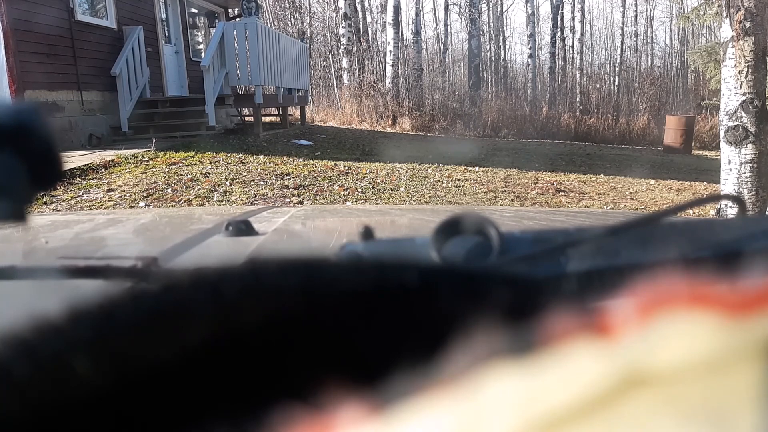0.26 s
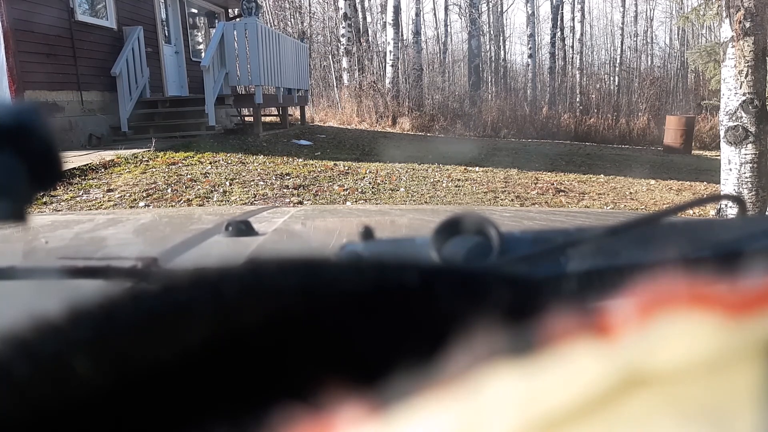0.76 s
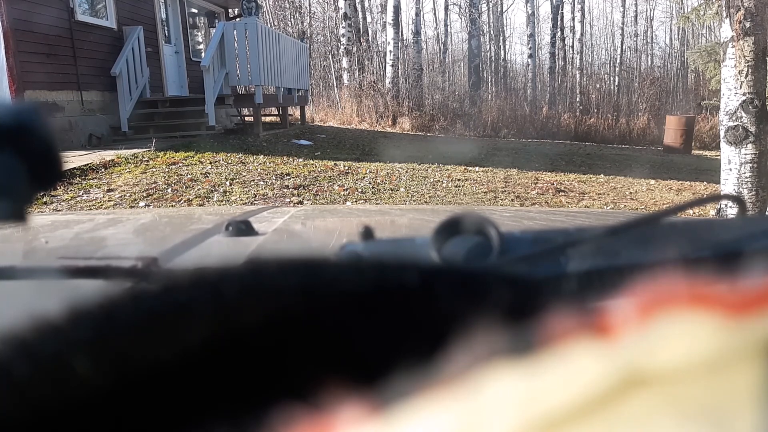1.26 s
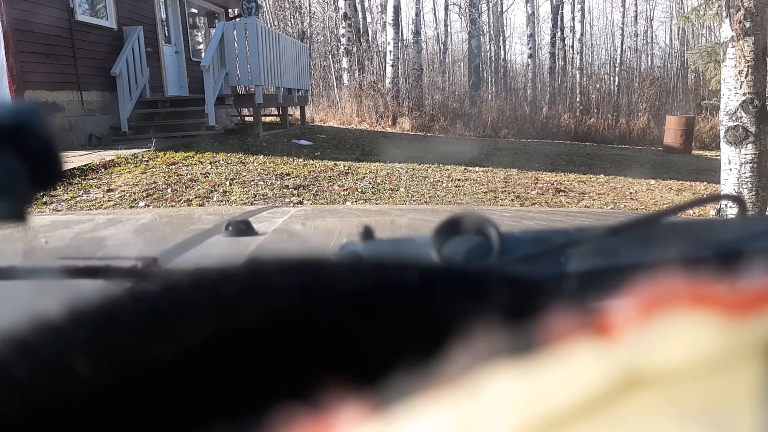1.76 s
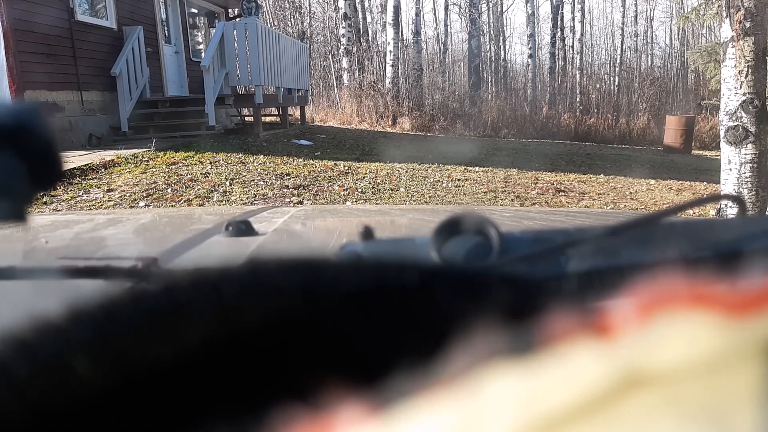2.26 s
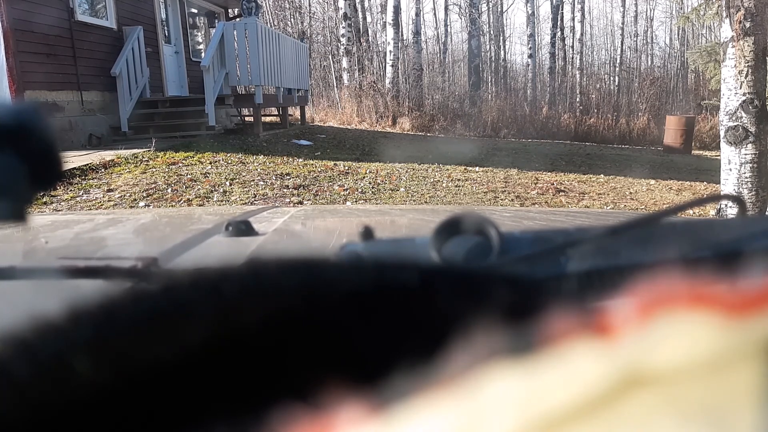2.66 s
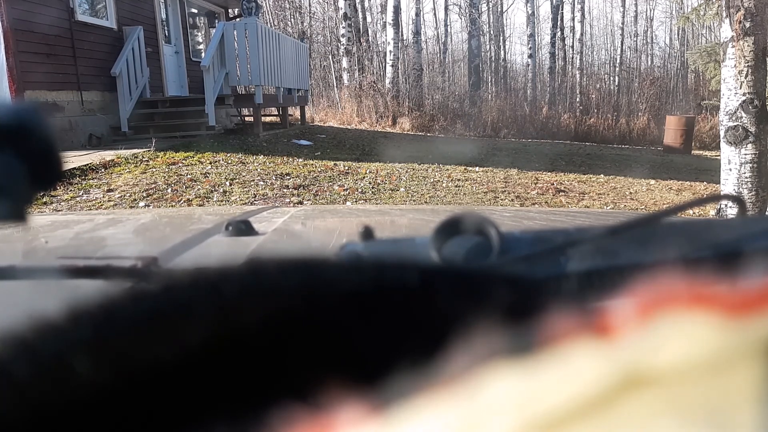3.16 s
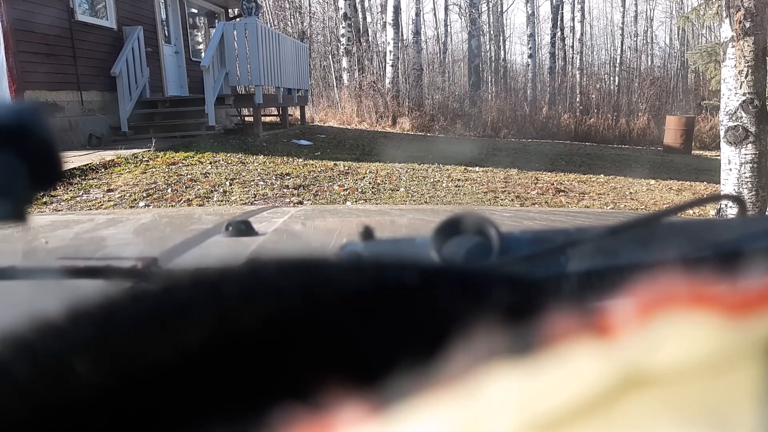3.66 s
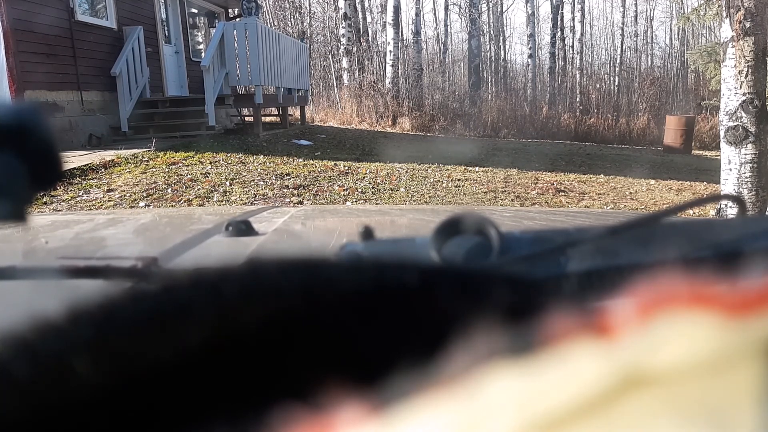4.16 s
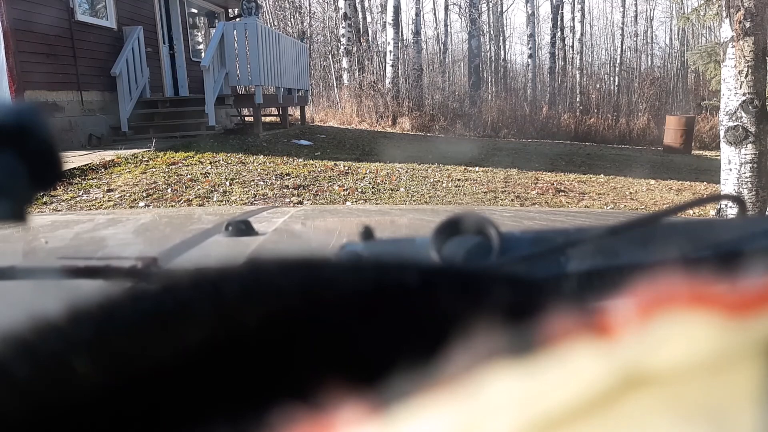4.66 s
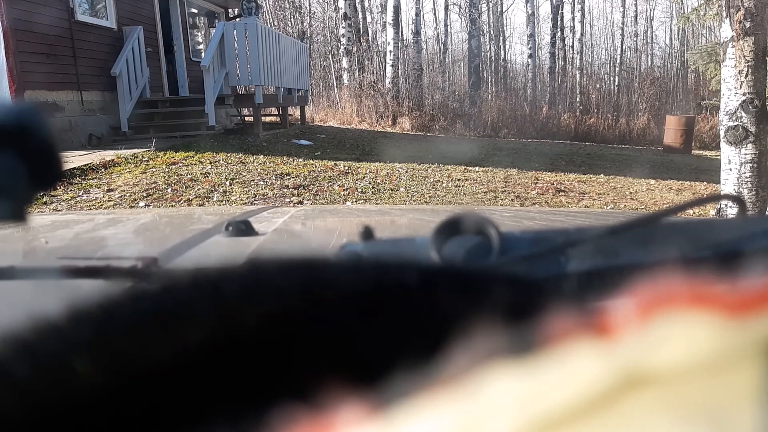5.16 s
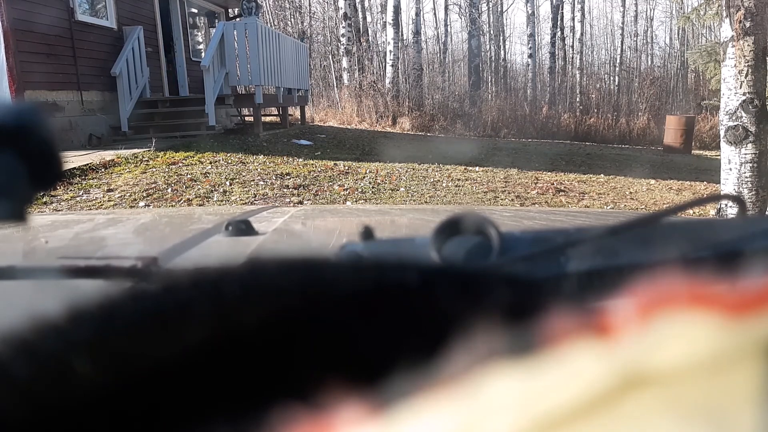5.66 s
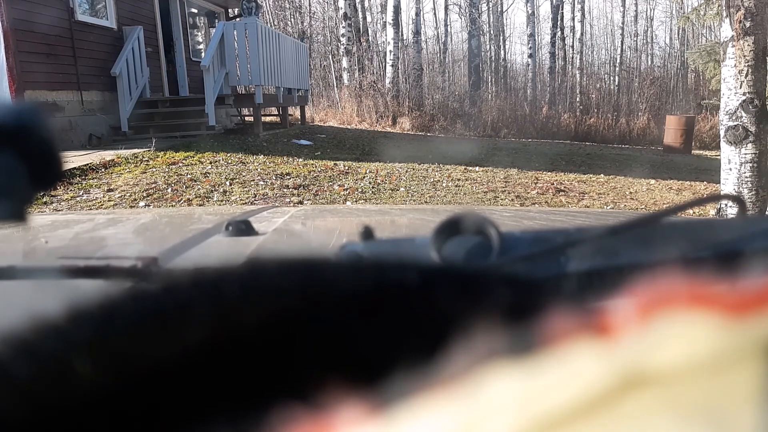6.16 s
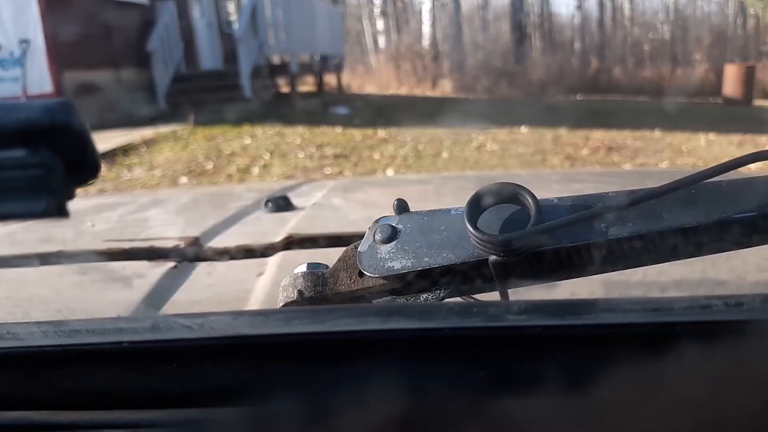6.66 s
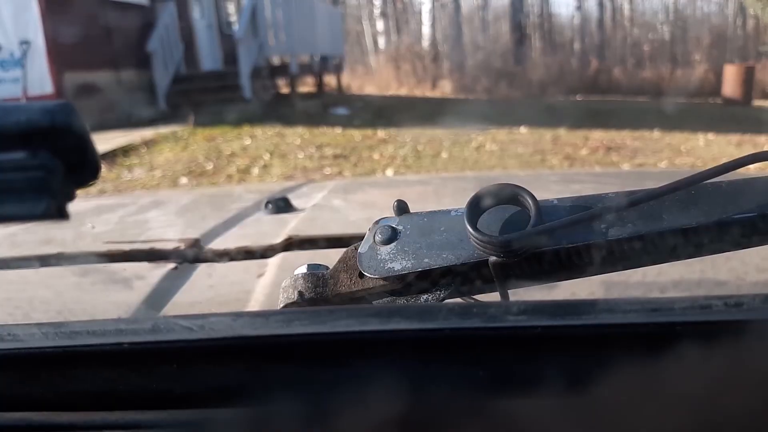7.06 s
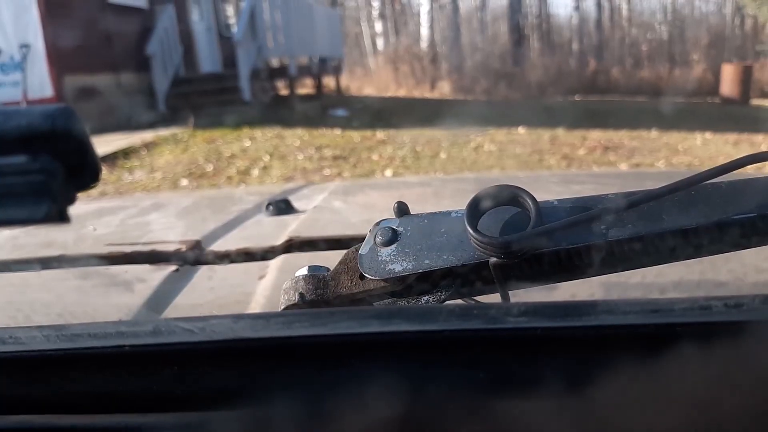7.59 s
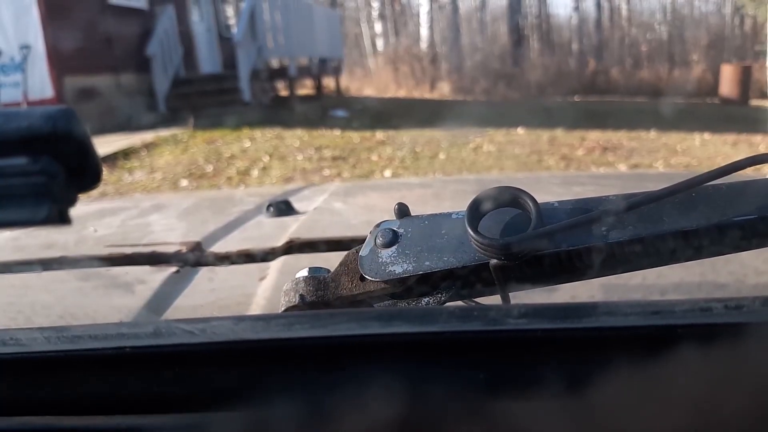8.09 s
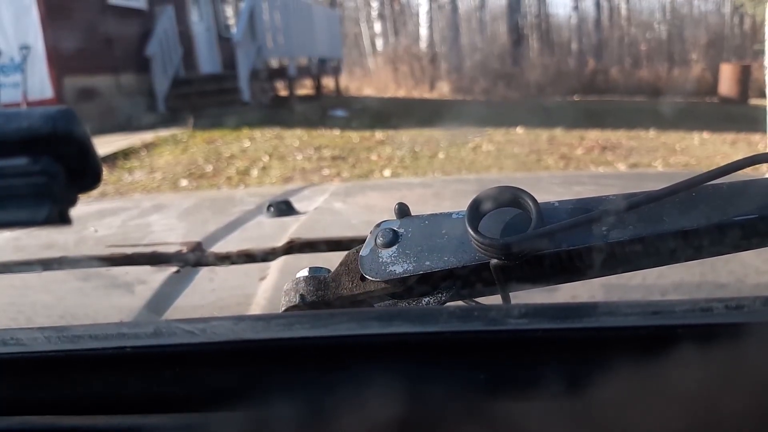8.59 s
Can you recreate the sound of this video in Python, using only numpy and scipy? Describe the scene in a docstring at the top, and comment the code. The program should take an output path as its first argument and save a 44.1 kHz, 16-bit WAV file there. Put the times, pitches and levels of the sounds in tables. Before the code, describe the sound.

Inside a pickup cab, a four-cylinder engine idles with a low boom and knock, then cuts to a slower idle with rapid squeaky rattling.

```python
"""Heard from a pickup's cab: a four-cylinder idle booms, with valve-train knock, gas rumble, lope and fan hum.
Cloth rustles, a small part ticks, the dash is bumped. After a short fade the idle is slower, a loose part
rattles over a hissing buzz at about the firing rate, and the engine picks up speed at the end. Summed
harmonics make the boom, filtered pulses the knock and lope, coloured noise the rumble, rustle and buzz,
decaying modes the hard parts."""
import sys
import numpy as np
from scipy import signal
from scipy.fft import rfft, irfft, next_fast_len
from scipy.io import wavfile
from scipy.ndimage import uniform_filter1d

SR = 44100
rng = np.random.default_rng(int(sys.argv[2]) if len(sys.argv) > 2 else 0)


def wav_record(signal):
    """Record a signal, one row per channel, as 16-bit PCM in the file named by sys.argv[1]."""
    frames = np.transpose(np.atleast_2d(signal))
    bounded = np.clip(frames, -1, 1)
    # unit amplitude maps onto the largest positive 16-bit level
    quanta = np.round(bounded * 32767).astype(np.int16)
    wavfile.write(sys.argv[1], SR, quanta)


N = 389393
T = np.arange(N) / SR
CUT_S = 6.72  # fast idle before, slow idle after

# The fast idle hunts. Each row: time in seconds, firing rate in Hz.
FAST_IDLE = [(0, 25.07), (0.3, 24.79), (0.7, 24.63), (1.3, 24.96), (1.5, 25.04), (1.7, 24.82), (2.1, 24.75),
             (2.9, 25.09), (3.1, 25), (3.5, 24.64), (3.9, 24.95), (4.3, 25.08), (4.7, 24.82), (4.9, 24.77),
             (5.5, 24.95), (5.9, 25.33), (6.1, 25.3), (6.3, 24.99), (6.72, 24.71)]
# Slow idle and final pick-up. Each row: time in seconds, firing rate in Hz, boom lift in dB.
SLOW_IDLE = [(6.72, 17.3, -2), (7.0, 18.3, -0.5), (7.25, 16.9, 2), (7.45, 17, -6), (7.7, 17.2, -7.5),
             (7.94, 17.6, 5), (8.35, 17.3, 1), (8.5, 17.8, 0), (8.62, 21.5, 6.5), (8.69, 25.8, 0),
             (8.77, 22.4, 7.5), (8.83, 22.8, 8)]
# Cab response to firing harmonics, fast idle. Each row: frequency in Hz, mean level in dB rms.
FAST_BOOM = [(25, -58), (50, -40), (75, -35), (100, -23.5), (125, -22), (150, -41), (175, -36), (200, -43),
             (225, -41.5), (250, -47), (275, -46.5), (300, -56), (350, -58), (375, -50)]
# The same, slow idle. Each row: frequency in Hz, level in dB rms before the boom lift.
SLOW_BOOM = [(17, -68), (34, -46), (52, -82), (69, -55), (86, -24.5), (103, -48), (120, -31), (138, -49),
             (155, -48), (172, -80), (275, -59)]
# Relative signed strength of each cylinder's unevenness (no unit).
CYLINDER_STRENGTHS = [-0.77, 0.51, -0.59, -1.3]
# Cab resonances rung by the unevenness. Each row: centre in Hz, filter width in Hz, fast-idle level in dB.
LOPE_MODES = [(135, 23, -54), (148, 25, -41.5), (166.7, 16, -48)]
# Block resonances. Each row: centre in Hz, filter width in Hz, level in dB before the fade, lag in seconds.
KNOCK_MODES = [(1200, 280, -48, 0), (1020, 200, -48, .003), (1150, 45, -51, 0.001), (1920, 260, -52, 0.001),
               (2480, 300, -62, 0.0015), (1220, 200, -59, .012), (680, 130, -55, .01),
               (2050, 350, -59, .028)]
# Slow change of the block's knock. Each row: time in seconds, gain in dB.
KNOCK_FADE = [(0, -1.5), (5.4, -1.5), (5.8, -6.5), (6.72, -8.5), (6.73, -7.5), (8.83, -27)]
# Panel rung at the slow idle. One row: centre in Hz, filter width in Hz, level in dB.
PANEL_MODE = (481, 17, -39.5)
# Accessory drive at the fast idle. Each row: centre in Hz, filter width in Hz, level in dB.
WHINE_MODES = [(3480, 120, -60), (3720, 110, -65.5)]
# Rumble colour, fast idle. Each row: frequency in Hz, relative dB per Hz.
FAST_RUMBLE = [(18, -48), (30, -22), (92, -17.5), (120, -3), (148, -7), (165, -11), (200, -13.5),
               (256, -11), (300, -22), (350, -16), (410, -21), (480, -20.5), (750, -32.5), (1140, -32),
               (1480, -43), (1920, -37), (2310, -43), (6800, -53.5), (8000, -62.5), (15600, -72)]
# Rumble colour, slow idle. Each row: frequency in Hz, relative dB per Hz.
SLOW_RUMBLE = [(18, -45), (30, -10), (90, -2.5), (182, -9), (243, -10.5), (300, -11.5), (400, -15),
               (478, -13), (540, -18), (641, -19), (1000, -27), (1920, -38), (4810, -38), (15600, -72)]

# Colour of the treble hiss. Each row: frequency in Hz, relative dB per Hz.
HISS_COLOUR = [(2500, 7), (4000, 5.5), (6700, 4.5), (8000, -5), (10500, 0.5), (13000, -8), (15000, -8),
               (16000, -10)]
# Treble hiss between the swells. Each row: time in seconds, level in dB before flicker.
HISS_REST = [(0, -61), (.6, -60.5), (1.6, -52), (4.6, -54), (5.3, -54.5), (6.6, -48.5), (7.1, -54),
             (8.83, -45)]
# Swells of treble hiss: cloth rubs, then from 7.4 s the buzz under the rattles.
# Each row: centre in seconds, peak in dB before flicker, half-length in seconds.
HISS_SWELLS = [(0.82, -49.5, 0.12), (1.134, -49, 0.028), (1.24, -52, 0.03), (1.697, -47, 0.068),
               (2.012, -47.5, 0.026), (2.238, -47, 0.051), (2.516, -53.5, 0.18), (2.827, -44, 0.017),
               (2.997, -49, 0.058), (3.187, -48.5, 0.11), (3.455, -51, 0.14), (3.868, -49.5, 0.11),
               (4.19, -47.5, 0.12), (4.427, -49, 0.082), (4.778, -48.5, 0.086), (5.615, -44.5, 0.052),
               (6.003, -47, 0.11), (6.27, -47, 0.17), (6.803, -48, 0.09), (7.455, -45.5, 0.21),
               (8.136, -43.5, 0.32), (8.802, -57, .1)]

# Rattles of a loose part. Each row: start in seconds, treble level in dB, squeak in Hz, its dB,
# second squeak in Hz, its dB, shared ring in dB (10 dB is added); dB after the first are re the treble.
RATTLES = [(2.66, -53.5, 3497, 0, 4500, -12, 6), (5.223, -54, 3520, 1, 4504, -12, -3),
           (5.9168, -33, 4940, -9, 6000, -6, -12), (6.766, -36.5, 4790, -20, 10350, -5, 6),
           (6.828, -39, 15400, -9, 7700, 2, -10), (6.886, -42.5, 8460, 2.5, 6500, -2, -12),
           (7.2913, -33, 5160, 0.5, 4310, -7, 2), (7.349, -32, 4610, 0.5, 5100, -2, 1),
           (7.405, -33, 5030, 0.5, 4500, -4, 6.5), (7.464, -31.5, 4480, 0, 5070, -3, 2),
           (7.5215, -32.5, 4900, -4, 4400, -8, 2), (7.5795, -32, 4800, -1, 4040, -8, 3.5),
           (7.638, -30.5, 5020, 0.5, 4280, 0, 0), (7.696, -32.5, 5300, 0.5, 4305, -5, 9),
           (7.754, -33, 4900, -1, 3694, -13, 9), (7.811, -29.5, 4760, 2.5, 3470, -8, -14),
           (7.869, -27.5, 4940, 3, 2630, -18, -16), (7.927, -30, 5000, 3, 4400, 2, -16),
           (7.984, -29.5, 4230, 4.5, 4900, -4, -18), (8.043, -29.5, 4330, 5, 3510, 1, -14),
           (8.101, -28.5, 4520, 3.5, 3440, -12, -13), (8.16, -30.5, 4540, 4.5, 3440, -6, -15),
           (8.217, -30, 4620, 4, 3300, -7, -18), (8.274, -30.5, 4380, 3.5, 3470, -9, -16),
           (8.332, -31.5, 4720, 3.5, 4280, 2, -12), (8.389, -32.5, 3190, 1.5, 2150, -4, -2),
           (8.444, -31, 4900, 5, 3430, -10, -16), (8.504, -32.5, 4990, -2.5, 7000, -3, 3),
           (8.559, -32.5, 9800, -4.5, 5000, -1, -6), (8.612, -35.5, 9950, 1, 4960, 0, -1)]
# How the part rubs. Each row: time in seconds, body noise in dB re the treble, squeak peak delay in seconds,
# noise t60 in seconds, largest upward slide of a squeak in Hz.
RUBBING = [(2.6, 6, .012, .078, 0), (5.2, 11.5, .012, 0.061, 0), (5.9, 1.5, 0.0047, 0.048, 0),
           (6.77, -13, 0.014, 0.06, 0), (6.9, 0, 0.011, .078, 0), (7.29, 4, .009, 0.073, 200),
           (7.76, 6, 0.0097, 0.09, 200), (7.81, 2.5, .013, 0.087, 900), (8.34, 4.5, .013, 0.096, 1100),
           (8.39, 5, 0.017, 0.087, 0), (8.45, 6.5, .012, .08, 800), (8.56, 1.5, 0.016, 0.081, 100)]
# Rattle body colour. Each row: frequency in Hz, relative dB per Hz.
RATTLE_BODY_COLOUR = [(1500, -25), (2500, -2), (4600, 0), (6000, -3), (7200, -4), (7700, -13)]
# Rattle treble colour. Each row: frequency in Hz, relative dB per Hz.
RATTLE_TREBLE_COLOUR = [(7600, -30), (8300, -8), (8900, -1), (9600, -4), (10500, 0), (11800, -6),
                        (13500, -8), (15000, -7), (15800, -13)]
# Close mode pair shared by all rattles. One row: pitch in Hz, beat in Hz, first null in seconds, depth 0-1.
RATTLE_PAIR = (6520, 70, .003, .85)
# Faint high resonance at a chance pitch. One row: lowest in Hz, highest in Hz, dB re the treble.
HIGH_SQUEAK = (12000, 20000, -8)

# Knocks on the dash. Each row: start in seconds, dB, hardness, starting pitch of the blow in Hz,
# dB of its falling tone, its length in seconds.
BUMPS = [(5.5035, -26, 1.1, 1550, -12, .014), (5.517, -28, 1.0, 1250, -23, .012),
         (5.715, -42, 1.5, 2300, -31, .009), (5.743, -48, 1.4, 2000, -38, .006),
         (5.921, -36, 0.4, 900, -14.5, .005), (5.929, -36, -.2, 900, -18.5, .009),
         (5.945, -43, -.6, 800, -23.5, .024)]
# Dash modes. Each row: frequency in Hz, relative dB, t60 in seconds.
DASH_MODES = [(271, -2, 0.06), (354, 10, 0.045), (384, 2, 0.081), (478, 22, 0.038), (550, -3, 0.07),
              (660, -3, 0.16), (790, 2.5, 0.097), (840, 1, 0.17), (952, 3, 0.14), (1050, 2.5, 0.094),
              (1290, 1, 0.043), (1540, 5.5, 0.027), (1780, -7, 0.053), (2370, -4, 0.025)]
# Dense body of a dash knock. Each row: frequency in Hz, relative dB per Hz.
THUD_COLOUR = [(150, -23), (280, 2), (500, -1), (800, -8), (1300, -19), (2500, -33), (5000, -80)]
# Rings of the small part. Each row: frequency in Hz, relative dB, t60 in seconds.
TICK_MODES = [(4650, -6, 0.1), (4738, 3, .05), (6560, -1, 0.054), (8930, -1.5, 0.084), (10560, 5.5, 0.042),
              (15160, -9, .055)]

# Noise shared by the two channels. Each row: frequency in Hz, left-right correlation.
LIKENESS = [(60, 0.92), (130, 0.75), (290, 0.73), (640, 0.077), (1410, 0.041), (3100, 0.027), (6820, 0.043),
            (15000, 0.079)]
# Port balance. Each row: frequency in Hz, left minus right in dB.
PORT_BALANCE = [(30, -2), (55, 2.5), (110, -5), (200, -4), (380, -5), (700, -6), (1290, -3.5), (2380, -5),
                (4400, 0.5), (8120, -9), (11000, -4.5), (15000, -21.5)]
# Port phase. Each row: frequency in Hz, radians by which the left leads.
LEFT_LEAD = [(30, 0.4), (100, -.5), (340, -0.38), (600, -0.062), (1030, 2.2), (1900, -0.13), (16000, -0.25)]
# Fade between the idles. Each row: time in seconds, gain in dB.
FADE = [(0, 0), (6.695, 0), (6.718, -35), (6.745, -7.5), (6.765, -1.5), (8.83, -3)]

HUM_HZ, HUM_DB = 93, -28.5  # means; both waver
TICK_S, TICK_DB, TICK_CRACK_RELATIVE_DB = 4.4241, -30, 1
THUD_RELATIVE_DB, THUD_T60_S = -1, 0.14
FALL_OCTAVES, FALL_TIME_CONSTANT_S = 2.5, .0095
KNOCK_SCATTER_DB = 1.0
ATTACK_S, ATTACK_S_PER_DB = .0022, .0006  # squeaky rattles start more slowly
RING_T60_S = .095
SECOND_SQUEAK_DELAY_SHARE = .6  # of the first squeak's delay
SQUEAK_POLE_WIDTH_HZ, SQUEAK_SETTLE_S = 620, .007
TOP_HZ = 15780


def undb(db):
    """Amplitude ratio of a dB value."""
    return 10 ** (np.asarray(db) / 20)


def level(x, db):
    """Scale to an rms level in dB."""
    return x * undb(db) / np.sqrt(np.mean(x ** 2))


def curves(table):
    """Columns of a time table, interpolated at every sample."""
    s, *columns = np.transpose(table)
    return [np.interp(T, s, column) for column in columns]


def on_hz(table, hz):
    """A frequency table read on a log-frequency axis."""
    at_hz, value = np.transpose(table)
    return np.interp(np.log(np.maximum(hz, 1)), np.log(at_hz), value)


def noise(colour, count=N):
    """Two-channel noise of a given colour, alike in the bass and nearly unrelated in the treble; rms 1."""
    size = next_fast_len(count)
    hz = np.arange(size // 2 + 1) * SR / size
    mid, side = rfft(rng.standard_normal((2, size)))
    alike = np.clip(on_hz(LIKENESS, hz), -.99, .99)
    pair = np.sqrt(1 + alike) * mid + np.sqrt(1 - alike) * side * np.array([[1], [-1]])
    coloured = irfft(pair * undb(on_hz(colour, hz)), size)
    return level(coloured[:, :count], 0)


def band(x, hz, width_hz):
    """Resonance with gain 1 at its centre."""
    return signal.lfilter(*signal.iirpeak(hz, hz / width_hz, fs=SR), x)


def resonate(x, hz, width_hz):
    """The same resonance twice, for steeper skirts."""
    return band(band(x, hz, width_hz), hz, width_hz)


def walk(rate_hz):
    """Random levels held for 1 / rate_hz and smoothed twice; spread near 1."""
    hold = int(SR / rate_hz)
    steps = np.repeat(rng.standard_normal(N // hold + 1), hold)
    return 1.62 * uniform_filter1d(uniform_filter1d(steps, hold), hold)[:N]


def rustle_and_buzz():
    """Flickering treble hiss with flat-topped swells: cloth rubs, later the buzz under the rattles."""
    t = T[::100]
    swell_power = sum(undb(2 * db) * np.exp(-((t - s) / half_s) ** 4) for s, db, half_s in HISS_SWELLS)
    rest_power = undb(2 * curves(HISS_REST)[0])
    flicker_db = 1.3 * walk(40)
    return np.sqrt(rest_power + np.interp(T, t, swell_power)) * undb(flicker_db) * noise(HISS_COLOUR)


def fan(slow):
    """A sine, wavering in level and pitch just under the fourth firing harmonic; fast idle only."""
    waver_db = 1.1 * walk(4)
    hum_hz = HUM_HZ + 0.7 * walk(4.07)
    return ~slow * np.sqrt(2) * undb(HUM_DB + waver_db) * np.sin(2 * np.pi * np.cumsum(hum_hz) / SR)


def tick():
    """A small hard part clicks once: a short noise crack and a few thin decaying rings."""
    out, t = np.zeros((2, N)), np.arange(SR // 5) / SR
    i = int(TICK_S * SR)
    rings = sum(undb(db - 60 * t / t60_s) * np.sin(2 * np.pi * hz * t + rng.uniform(0, 2.8, (2, 1)))
                for hz, db, t60_s in TICK_MODES)
    grit = noise(RATTLE_BODY_COLOUR, count=len(t)) + undb(-9) * noise(RATTLE_TREBLE_COLOUR, count=len(t))
    crack = undb(TICK_CRACK_RELATIVE_DB - 60 * t / 0.042) * grit
    out[:, i:i + len(t)] = undb(TICK_DB) * ((1 - np.exp(-t / 0.00089)) * rings + crack)
    return out


def falling_blow(t, start_hz, db, blow_s):
    """Bending waves arrive treble first, so the pitch of a blow falls."""
    hz = start_hz * 2 ** (-FALL_OCTAVES * (1 - np.exp(-t / FALL_TIME_CONSTANT_S)))
    push = np.sin(np.pi * np.minimum(t / blow_s, 1) ** 1.2).clip(0) ** .55
    return undb(db) * push * np.sin(2 * np.pi * np.cumsum(hz) / SR + rng.uniform(0, 2 * np.pi))


def dash_ring(t, hz, t60_s):
    """One decaying dash mode; low modes build up later."""
    phase = rng.uniform(0, 2 * np.pi) + 1.16 * rng.standard_normal((2, 1))
    build_up = (1 - np.exp(-t * hz / 2.5)) ** 2
    return np.sin(2 * np.pi * hz * t + phase) * undb(-60 * t / t60_s) * build_up


def bumps():
    """Knocks on the dash drop in pitch, thud and ring its modes; harder ones favour higher modes."""
    out, t = np.zeros((2, N)), np.arange(SR // 5) / SR
    for s, db, hardness, start_hz, fall_db, blow_s in BUMPS:
        i = int(s * SR)
        hit = out[:, i:i + len(t)]  # a view: adding here adds to out
        hit += falling_blow(t, start_hz, fall_db, blow_s)
        thud_db = db + THUD_RELATIVE_DB - 4 * (hardness + 2.0) - 60 * t / THUD_T60_S
        hit += undb(thud_db) * (1 - np.exp(-t / 0.0041)) * noise(THUD_COLOUR, count=len(t))
        for hz, mode_db, t60_s in DASH_MODES:
            tilt_db = 6 * (hardness - 1) * np.log2(hz / 800)
            hit += undb(db + mode_db + tilt_db) * dash_ring(t, hz, t60_s)
    return out


def swell(t, peak_s):
    """Smooth rise and fall that peaks at 1 after peak_s."""
    return (t / peak_s * np.exp(1 - t / peak_s)) ** 3.5


def squeal(hz, slide_hz, chance, t):
    """A narrow wavering tone that starts flat and settles on or slightly above its pitch; rms 1."""
    pole = np.exp(-np.pi * SQUEAK_POLE_WIDTH_HZ / SR)
    drive = chance[:2] + 1j * chance[2:] + 1.16 * chance[0, ::-1]
    waver = signal.lfilter([1], [1, -2 * pole, pole ** 2], drive)
    pitch_hz = hz + slide_hz * rng.uniform(.3, 1) * (.2 - np.exp(-t / SQUEAK_SETTLE_S))
    return level(np.real(waver * np.exp(2j * np.pi * np.cumsum(pitch_hz) / SR)), 0)


def rattle():
    """Each rattle is a grainy burst of rubbing noise; squeaks swell in it and a close pair of modes beats."""
    body, treble = noise(RATTLE_BODY_COLOUR), noise(RATTLE_TREBLE_COLOUR)
    out, t = np.zeros((2, N)), np.arange(SR // 8) / SR
    white = rng.standard_normal((len(RATTLES), 3, len(t)))
    ring_hz, beat_hz, null_s, depth = RATTLE_PAIR
    beat = np.abs(1 - depth * np.exp(2j * np.pi * beat_hz * (t - null_s))) / (1 + depth)
    lowest_hz, highest_hz, high_db = HIGH_SQUEAK
    highs_hz = rng.uniform(lowest_hz, highest_hz, len(RATTLES))
    at_s, *rubbing = np.transpose(RUBBING)
    for row, high_hz, w in zip(RATTLES, highs_hz, white):
        s, db, first_hz, first_db, second_hz, second_db, ring_db = row
        body_db, peak_s, t60_s, slide_hz = (np.interp(s, at_s, column) for column in rubbing)
        span = slice(int(s * SR), int(s * SR) + len(t))

        attack_s = ATTACK_S + ATTACK_S_PER_DB * max(first_db, 0)
        shape = (1 - np.exp(-t / attack_s)) ** 2 * undb(-60 * np.maximum(t - .01, 0) / t60_s)
        grain = shape * undb(4.4 * uniform_filter1d(w[0, ::-1], size=36))
        high = level(band(w[0] + 2.0 * w[1:], high_hz, 370.0), high_db)
        rub = grain * (undb(body_db) * body[:, span] + treble[:, span] + high)

        stutter = undb(13 * uniform_filter1d(w[1, ::-1], size=100))
        squeaks = ((first_hz, first_db, peak_s),
                   (second_hz, second_db, SECOND_SQUEAK_DELAY_SHARE * peak_s))
        squeak = sum(undb(q_db) * swell(t, q_s) * squeal(hz, slide_hz, rng.standard_normal((4, len(t))), t)
                     for hz, q_db, q_s in squeaks)

        # chance detuning and phases
        tone = np.sin(2 * np.pi * ring_hz * (1 + .009 * w[0, 0]) * t + 2 * w[1:, :1])
        ring = tone * beat * (1 - np.exp(-t / 0.0046)) ** 2 * undb(ring_db + 10 - 60 * t / RING_T60_S)
        out[:, span] += undb(db) * (rub + stutter * squeak + ring)
    return out


def rumble(fired, slow):
    """Gas and panel noise that swells a little with each firing."""
    throb = undb(1.4 * np.cos(2 * np.pi * (fired - .1)) + 0.5 * walk(9))
    return throb * np.where(slow, undb(-26.0) * noise(SLOW_RUMBLE), undb(-27.5) * noise(FAST_RUMBLE))


def lope(fired, slow):
    """Unequal cylinders: a four-firing pattern that rings the cab between the harmonics."""
    count = np.floor(fired - .3).astype(int)
    strength = np.array(CYLINDER_STRENGTHS)[count % 4] * undb(0.86 * walk(22))
    pulses = np.append(0, np.diff(count)) * strength
    ringing = sum(level(resonate(pulses, hz, width_hz), db) for hz, width_hz, db in LOPE_MODES)
    return ringing * undb(-8 * slow)


def whine(fired):
    """Accessory drive: narrow noise that pipes up at every second firing and comes and goes."""
    out = 0
    for hz, width_hz, db in WHINE_MODES:
        tone = resonate(noise(HISS_COLOUR), hz, width_hz)
        gain_db = 3 * np.cos(np.pi * (fired + .5)) + 1.8 * walk(14)
        out = out + level(tone * undb(gain_db), db)
    return out


def knock(fired, slow):
    """A valve-train rap at each firing rings the block; a panel answers at the slow idle, a whine at the fast."""
    count = fired.astype(int)
    blows = np.append(0, np.diff(count)) * undb(.5 * rng.standard_normal(400))[count]
    decay = np.exp(-1 / (0.0063 * SR))
    grit = rng.standard_normal((2, N)) * signal.lfilter([1], [1, -decay], blows)
    rap = blows + .016 * grit
    # each rap strikes each resonance with its own strength
    shares = undb(KNOCK_SCATTER_DB * rng.standard_normal((len(KNOCK_MODES), 400)))[:, count]
    block = 0
    for (hz, width_hz, db, lag_s), share in zip(KNOCK_MODES, shares):
        mode = resonate(rap * share, hz, width_hz)
        block = block + level(np.roll(mode, int(lag_s * SR), axis=1), db)
    panel_hz, panel_width_hz, panel_db = PANEL_MODE
    panel = level(band(blows + .03 * grit, panel_hz, panel_width_hz), panel_db)
    return undb(curves(KNOCK_FADE)[0]) * block + np.where(slow, panel, whine(fired))


def boom(fired, hz, lift_db):
    """Firing harmonics weighted by the cab; they peak together half a firing after the knock."""
    out, fast = 0, np.clip((hz - 21) / 3, 0, 1)  # cab response blends from slow to fast over 21-24 Hz
    for k in range(1, 16):
        cab_db = fast * on_hz(FAST_BOOM, k * hz) + (1 - fast) * on_hz(SLOW_BOOM, k * hz)
        gain = undb(cab_db + lift_db + 0.79 * walk(6))
        out = out + np.sqrt(2) * gain * np.cos(2 * np.pi * k * (fired - .51))
    return out


def scene():
    """Firing count drives the engine layers; the other sources are added."""
    slow = T > CUT_S
    slow_hz, lift_db = curves(SLOW_IDLE)
    hz = np.where(slow, slow_hz, curves(FAST_IDLE)[0])
    fired = .84 + np.cumsum(hz) / SR + .4 * slow  # the knock falls on whole numbers
    engine = rumble(fired, slow) + lope(fired, slow) + knock(fired, slow) + boom(fired, hz, lift_db * slow)
    return rustle_and_buzz() + fan(slow) + tick() + bumps() + rattle() + engine


def record(dry):
    """Two ports differ in level and phase by frequency; a short fade joins the idles; the top is cut."""
    size = next_fast_len(N)
    hz = np.arange(size // 2 + 1) * SR / size
    tilt = undb(on_hz(PORT_BALANCE, hz) / 2)
    ports = np.array([tilt * np.exp(1j * on_hz(LEFT_LEAD, hz)), 1 / tilt])
    heard = irfft(rfft(dry, size) * ports, size)[:, :N]
    faded = heard * undb(curves(FADE)[0])
    return signal.sosfilt(signal.ellip(10, .2, 50, TOP_HZ, fs=SR, output="sos"), faded)


dry = scene()
out = record(dry)
wav_record(out)
```